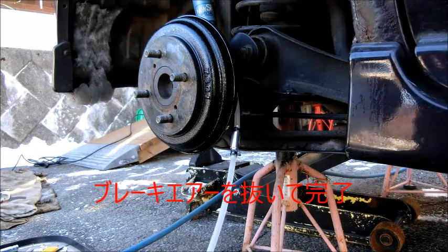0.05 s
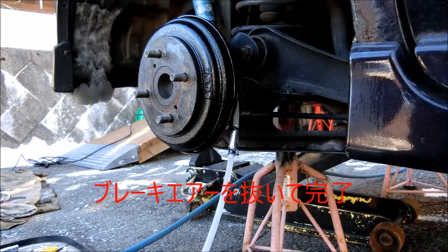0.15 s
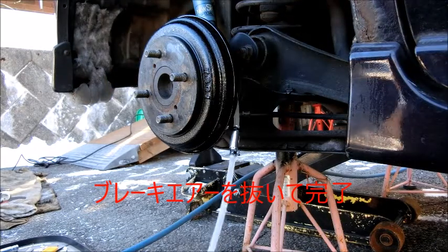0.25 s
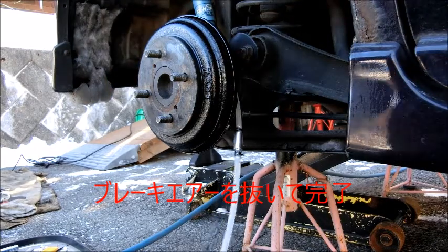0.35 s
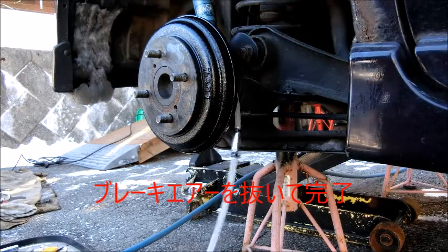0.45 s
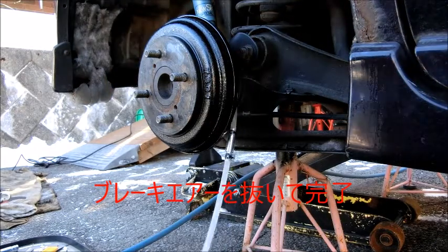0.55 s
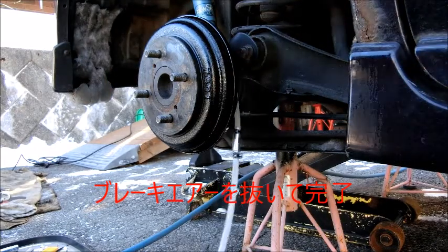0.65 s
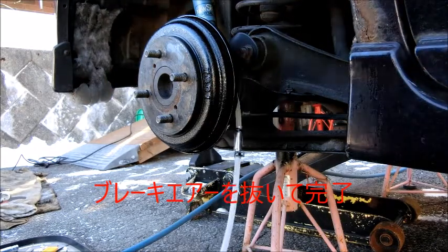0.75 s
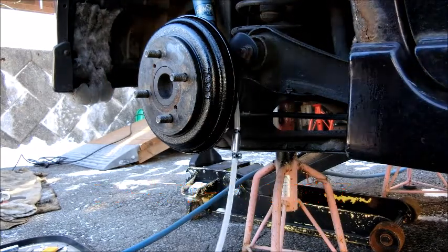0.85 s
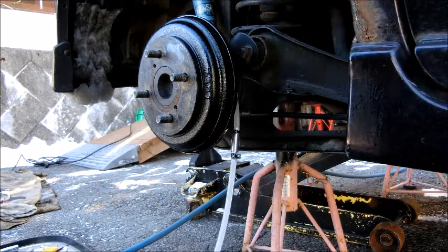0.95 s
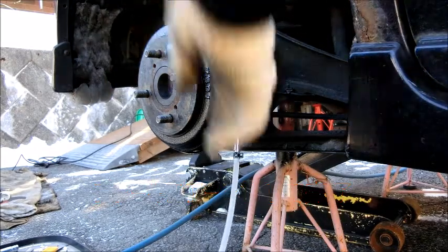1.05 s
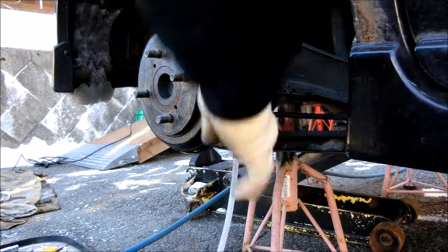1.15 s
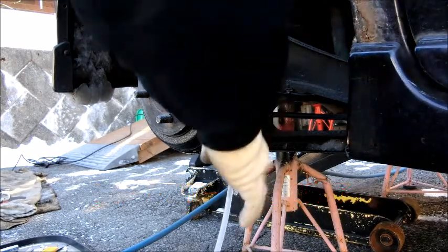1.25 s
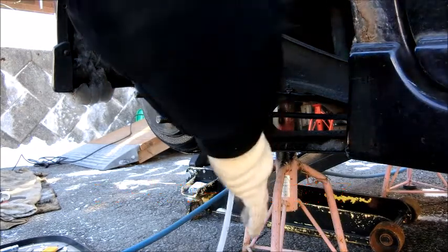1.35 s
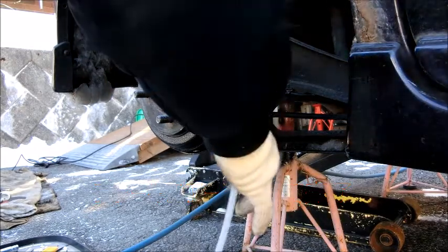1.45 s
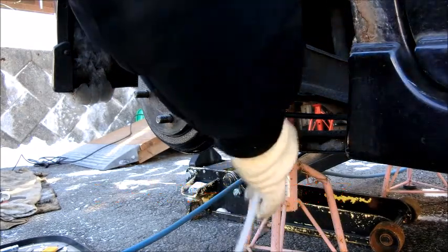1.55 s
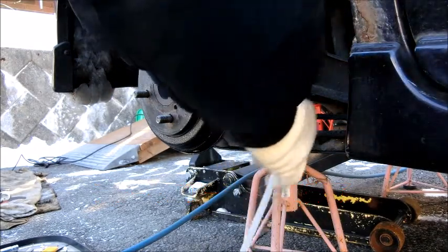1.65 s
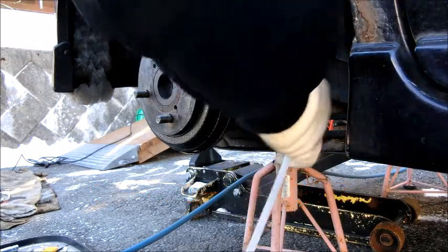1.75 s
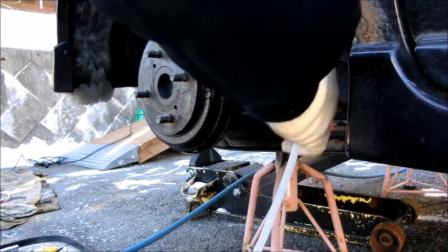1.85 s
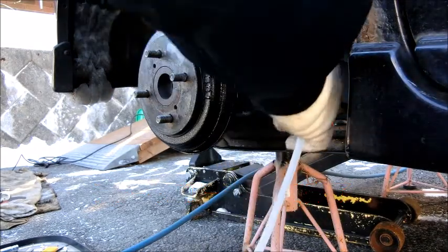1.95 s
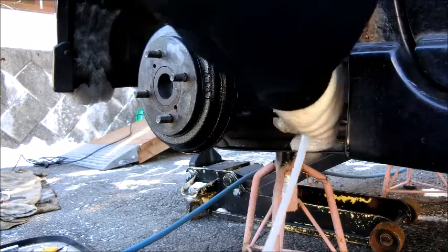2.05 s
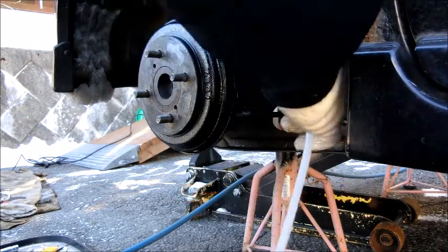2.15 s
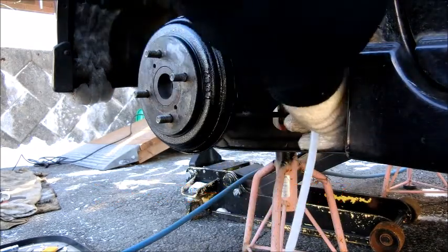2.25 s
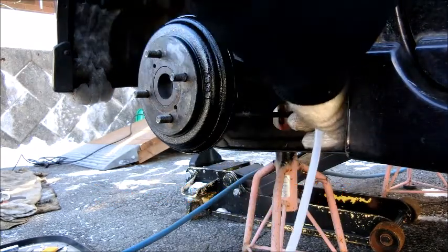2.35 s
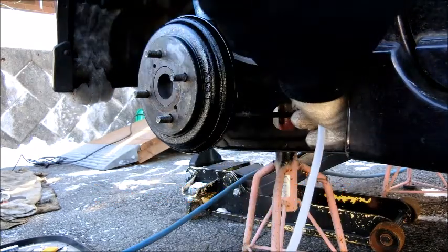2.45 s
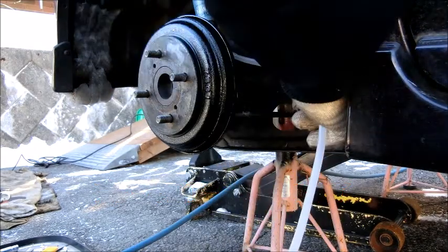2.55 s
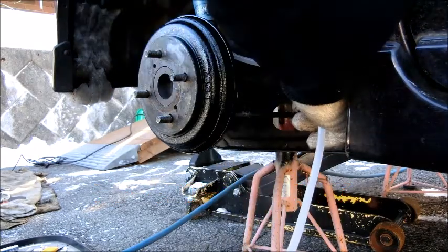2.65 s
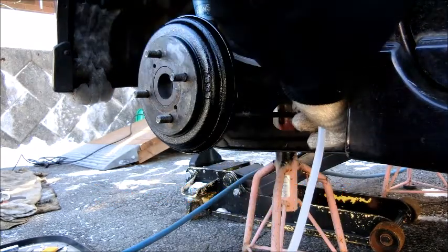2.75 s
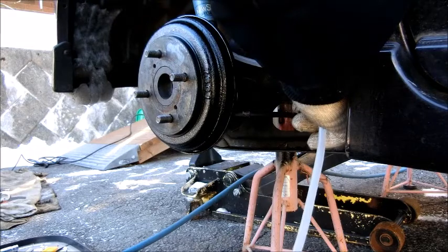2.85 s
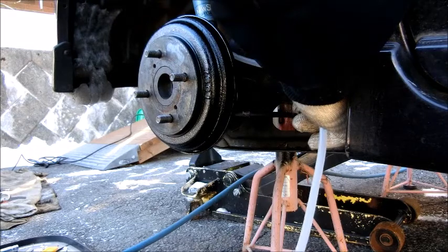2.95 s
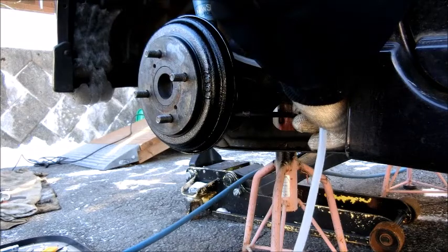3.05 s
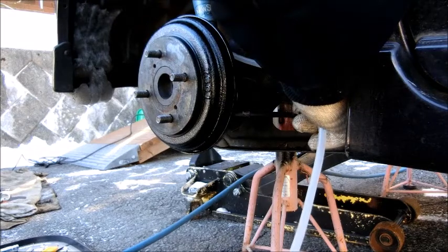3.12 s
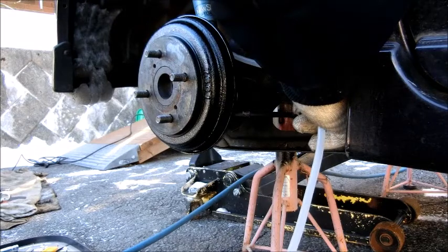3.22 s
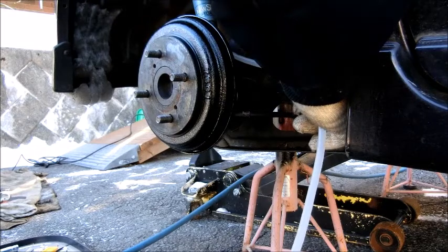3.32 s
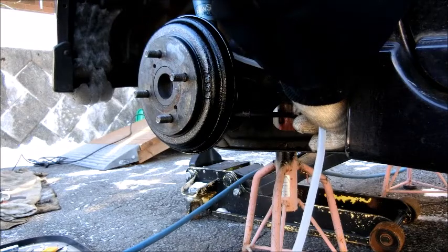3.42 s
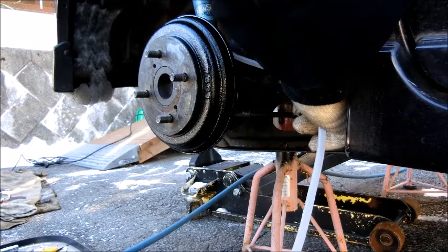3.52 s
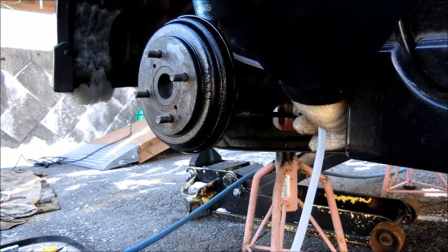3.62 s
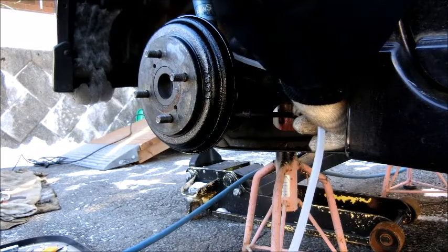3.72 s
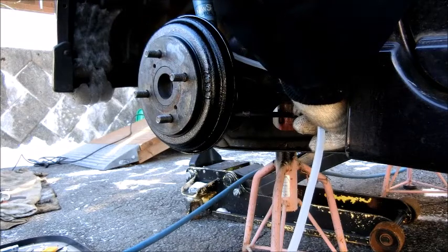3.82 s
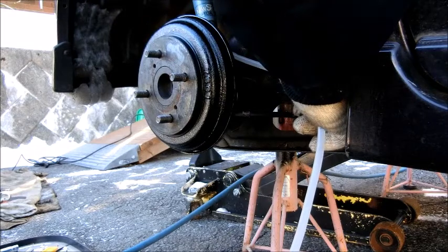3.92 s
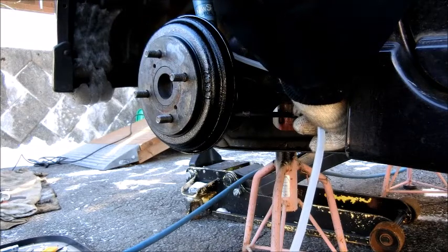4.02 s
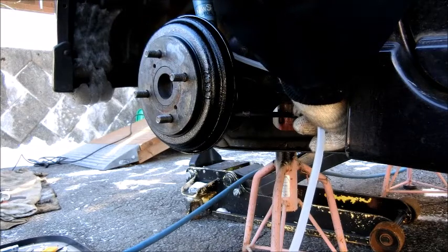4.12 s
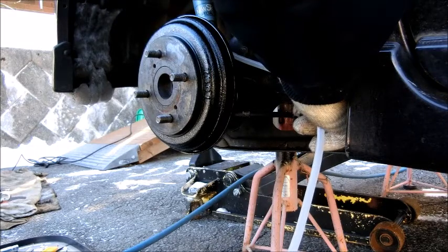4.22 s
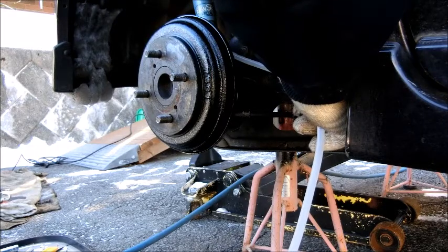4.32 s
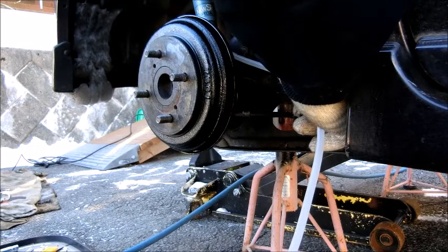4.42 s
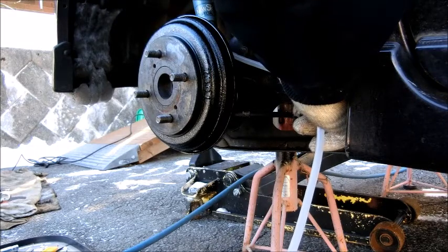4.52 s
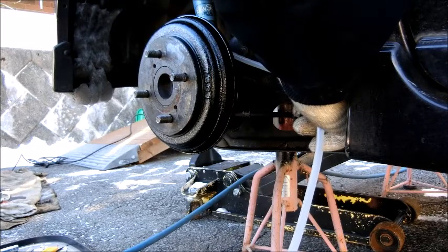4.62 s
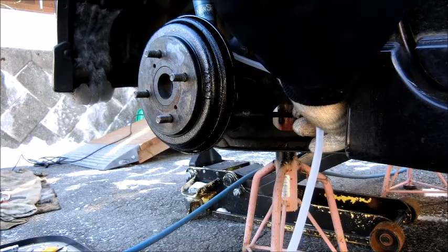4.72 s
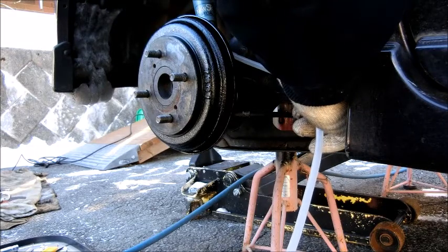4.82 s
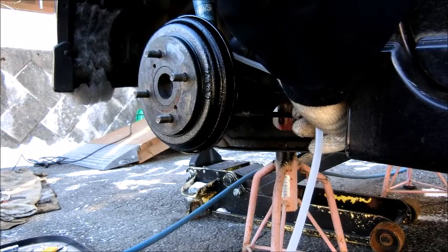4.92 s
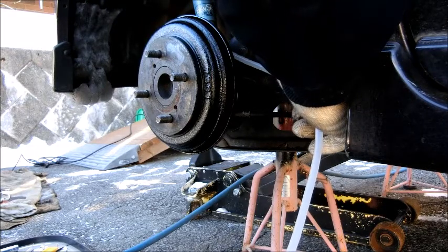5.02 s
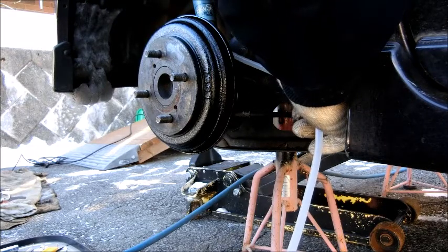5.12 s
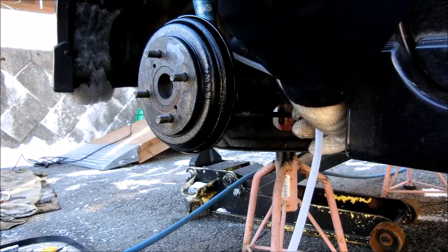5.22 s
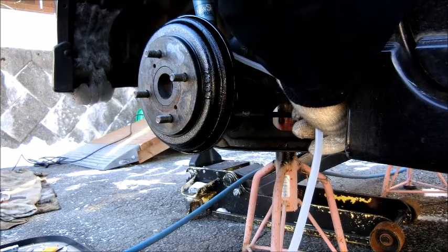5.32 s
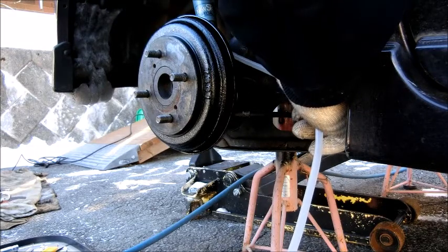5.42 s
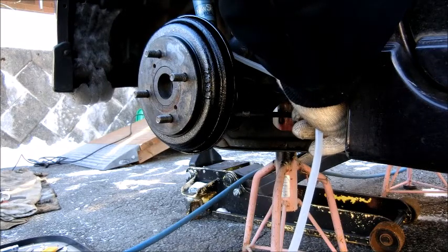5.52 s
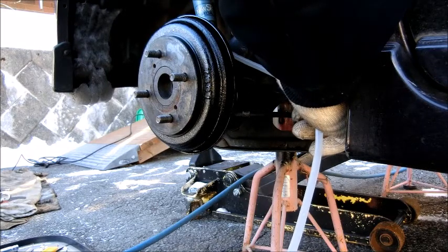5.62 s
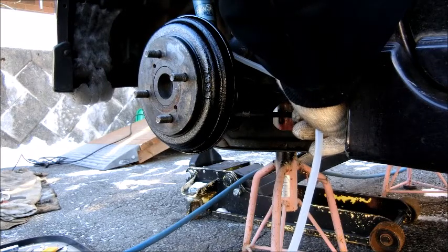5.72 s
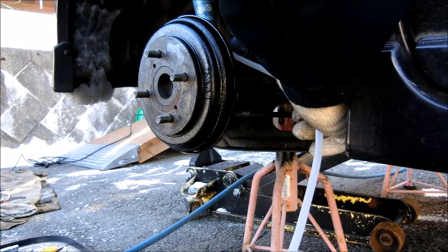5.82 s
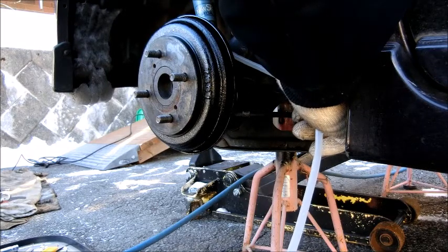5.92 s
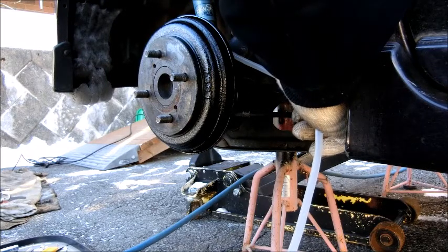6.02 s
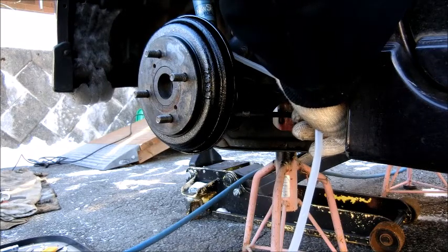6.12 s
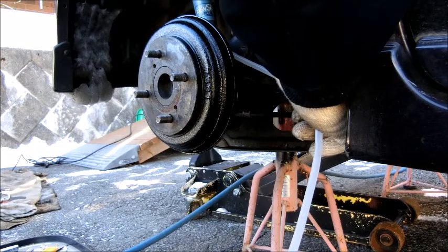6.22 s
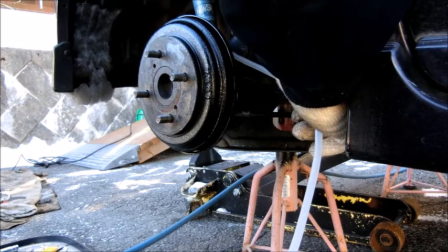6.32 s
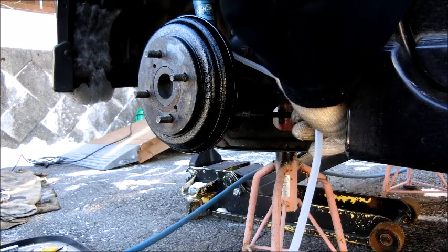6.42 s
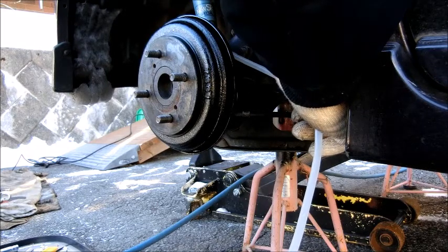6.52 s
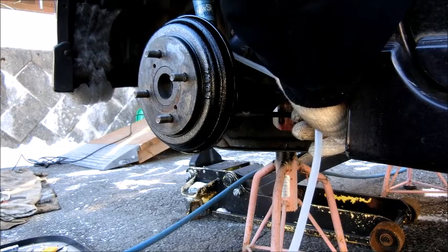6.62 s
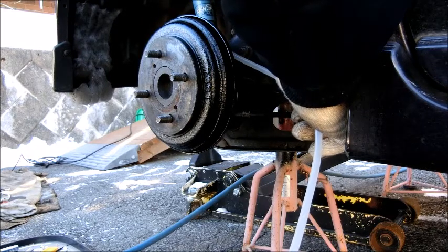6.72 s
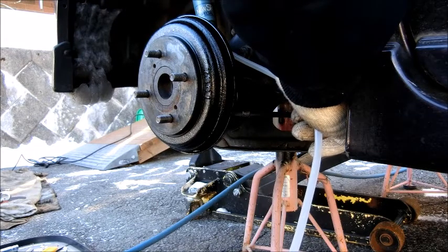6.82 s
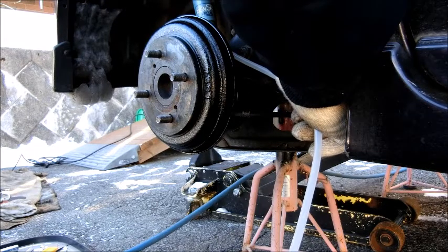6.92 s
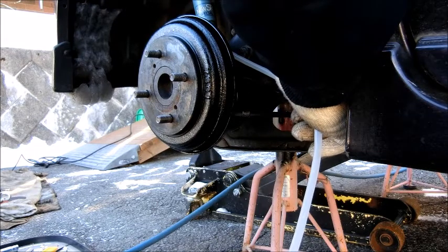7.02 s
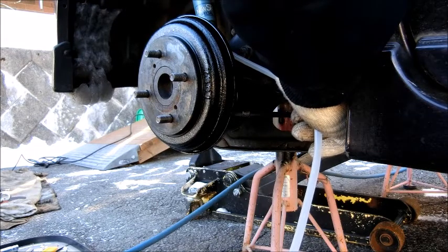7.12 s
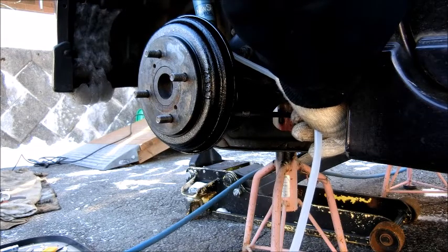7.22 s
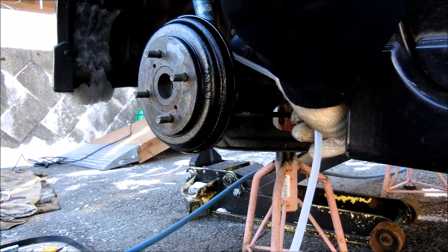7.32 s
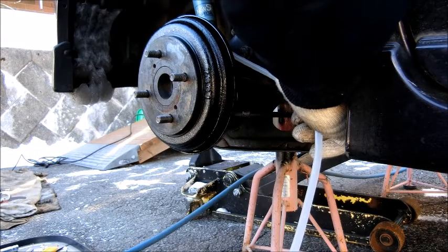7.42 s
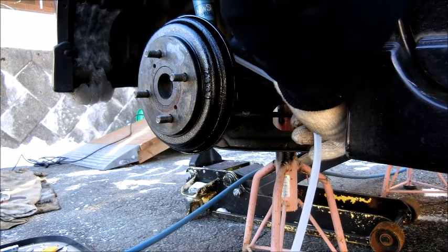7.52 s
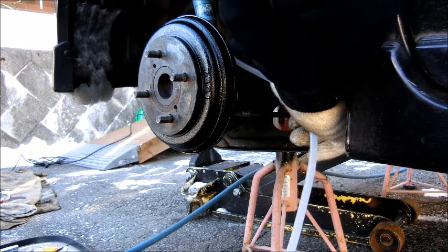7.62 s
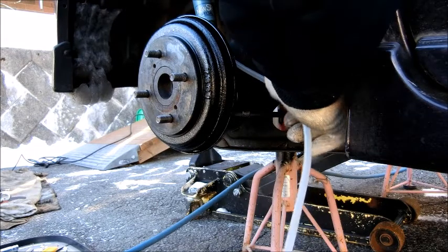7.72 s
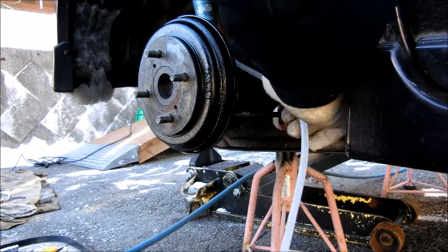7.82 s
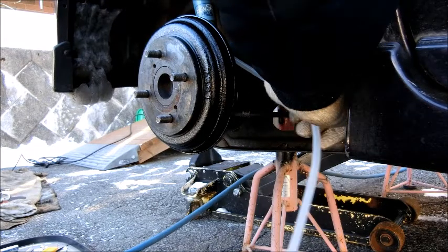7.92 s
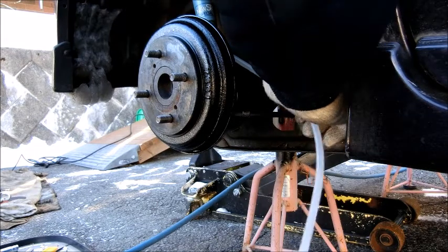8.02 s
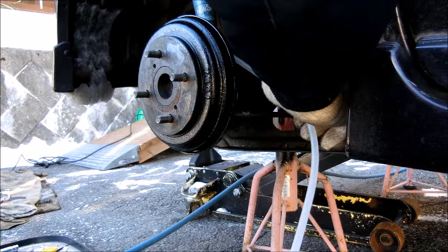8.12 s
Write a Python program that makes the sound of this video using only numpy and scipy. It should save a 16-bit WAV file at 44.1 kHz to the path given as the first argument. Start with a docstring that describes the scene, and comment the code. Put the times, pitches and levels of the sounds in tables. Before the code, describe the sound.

A loud, high hiss of compressed air from a brake bleeder dominates, starting abruptly after about two and a half seconds and running on with a slight flutter. Before it, the yard is quiet: a slight leak, a few light metal taps and ticks, a sleeve swishing near the microphone, brief wind puffs on the right and very faint distant tones.

```python
"""A loud, steady hiss of air starts after a few quiet taps and rustles. A hand opens an air-driven brake
bleeder beside a wheel hub: the hose coughs and the turbulent jet hisses on, its sound bouncing off hand,
drum and axle to each microphone port. Before that: a slight leak, a tool tapping steel, a sleeve rustling
past, wind puffs on the right port and faint far tones, over low yard noise."""
import sys
import numpy as np
from scipy import signal
from scipy.fft import rfft, irfft, next_fast_len
from scipy.io import wavfile
from scipy.ndimage import uniform_filter1d, map_coordinates

SR = 44100
rng = np.random.default_rng(int(sys.argv[2]) if len(sys.argv) > 2 else 0)


def wav_record(signal):
    """Record a signal, one row per channel, as 16-bit PCM in the file named by sys.argv[1]."""
    frames = np.transpose(np.atleast_2d(signal))
    bounded = np.clip(frames, -1, 1)
    # unit amplitude maps onto the largest positive 16-bit level
    quanta = np.round(bounded * 32767).astype(np.int16)
    wavfile.write(sys.argv[1], SR, quanta)


N = 359856


def jet():
    """Stored pressure surges, the jet hisses, the hose coughs; a recorder noise floor follows the hiss."""
    # open-jet level: t/s, level/dB
    flow = [(2.6, -16), (3.2, -16.5), (4.5, -17.5), (4.53, -18.5), (4.88, -17), (4.95, -18.5),
            (5.98, -16.5), (6.7, -17), (7.81, -16), (7.84, -18.5), (8.16, -17.5)]
    # flat recorder noise floor: f/Hz, density/dB
    floor_spectrum = [(20, -1), (80, -2), (400, -0.5), (2200, 1.5), (4000, 0.5), (7000, 4), (12000, -15)]
    # hollow hose spectrum: f/Hz, density/dB
    hose_spectrum = [(900, -40), (1700, -15), (2250, -5), (2800, -9), (4000, -11), (5500, -7), (7000, 2),
                     (8000, 3), (8700, 2), (9500, -40)]
    open_s, rise_db_per_s, floor_lead_s = 2.589, 748, 0.02
    surge_db, surge_s, floor_db = 2.5, 0.094, -14.5
    flow_db = curve(flow)
    since_s = np.arange(N) / SR - open_s
    held_s = np.maximum(since_s, 0)
    opening = amp(rise_db_per_s * np.minimum(since_s, 0))
    floor_gain = amp(flow_db + floor_db + rise_db_per_s * np.minimum(since_s + floor_lead_s, 0))
    surge = amp(surge_db * np.exp(-held_s / surge_s))
    hiss = amp(flow_db) * surge * nozzle_hiss()
    noise_floor = floor_gain * noise(floor_spectrum, [(500, 0), (2000, 0.17), (4000, 0.15)], 0.013)
    cough_gain = amp(-24.5) * decay(held_s, t60_s=0.3) + amp(-29) * decay(held_s, t60_s=2.6)
    cough = cough_gain * noise(hose_spectrum, [(2000, 0.6)], lag_ms=0.024)
    return opening * (hiss + cough) + noise_floor


def nozzle_hiss():
    """Turbulent hiss with slight flutter, reflected differently to each port."""
    # nozzle spectrum: f/Hz, density/dB
    spectrum = [(1500, -29.5), (3000, -27.5), (4500, -12), (6500, -11), (9000, 0.5), (12000, 1),
                (14000, -1), (15250, -3), (15500, -12), (15800, -15.5)]
    # near reflections per port: delay/ms, gain in first grip, gain in second grip
    echoes_left = [(0.309, -0.24, -0.05), (0.383, -0.03, 0.1), (0.488, -0.03, -0.1), (0.676, -0.18, -0.14),
                   (0.82, 0.12, 0.17), (0.953, -0.1, -0.04), (1.024, -0.08, -0.01), (1.78, -0.08, -0.05),
                   (1.928, 0.07, 0.05)]
    echoes_right = [(0.177, 0.19, 0.04), (0.282, 0.06, -0.14), (0.461, 0.1, -0.06), (0.599, -0.08, 0.05),
                    (0.694, -0.13, -0.08), (0.781, -0.01, 0.08), (0.834, 0.08, 0.07), (1.045, -0.04, -0.07),
                    (1.76, -0.04, -0.02)]
    source = noise(spectrum, [(4000, 0.6), (8000, 0.68), (15000, 0.66)], lag_ms=0.061)
    left, right = eddies(source, depth_db=1.23)
    ports = np.array([amp(1.25) * reflections(left, echoes_left), reflections(right, echoes_right)])
    flutter = amp(0.1 * wobble(9.1) + 0.3 * wobble(70) + 0.23 * wobble(400))
    return flutter * unit_rms(ports)


def reflections(x, echoes):
    """Direct sound plus near echoes, whose gains blend as the hand shifts."""
    # hand on the bleeder: t/s, blend (0 first grip, 1 second)
    grip = [(4.2, 0.02), (4.6, .6), (5.6, 1), (7.4, .98), (7.6, 0.86)]
    blend = np.clip(curve(grip), 0, 1)
    delay_ms, *gains = np.transpose(echoes)
    comb = lambda hz: 1 + np.array(gains) @ np.exp(-2j * np.pi * hz * delay_ms[:, None] / 1000)
    first, second = filtered(x, comb)
    return (1 - blend) * first + blend * second


def eddies(x, depth_db):
    """Random gain patches in time and frequency as eddies come and go."""
    bins = signal.stft(x, nperseg=256)[2]
    field = uniform_filter1d(rng.standard_normal(bins.shape[1:]), size=3, axis=0)
    field = uniform_filter1d(field, size=12, axis=1)
    return signal.istft(bins * amp(depth_db * unit_rms(field)), nperseg=256)[1][:, :N]


def tool_taps():
    """A tool chatters on steel and rings it; loose contact blurs the higher modes. Mono."""
    # blows: t/s, level/dB, brightness/(dB/octave)
    taps = [(0.3154, -33, -3), (0.377, -37, 0.5), (0.4167, -47, 5), (0.4222, -45, -0.5)]
    # steel modes: f/Hz, level/dB, t60/s
    modes = [(620, -14, 0.1), (1127, -6, 0.16), (1350, -9, .05), (1990, -4.5, 0.072), (2203, -2.5, 0.13),
             (2620, 1.5, 0.04), (2600, -6, 0.04), (3480, -3, 0.064), (3960, -3, 0.063), (4270, -8, .04),
             (5300, -1, 0.047), (6400, -12, 0.058), (7000, 0, 0.048), (8000, -8, .04)]
    out, t = np.zeros(N), np.arange(SR // 4) / SR
    bounce = round(0.0071 * SR)  # the tool lands twice
    for start_s, db, bright_db in taps:
        phase_walks = 0.11 * np.cumsum(rng.standard_normal((len(modes), len(t))), axis=1)
        ring = np.zeros(len(t))
        for (hz, mode_db, t60_s), walk in zip(modes, phase_walks):
            gain = amp(mode_db + bright_db * np.log2(hz / 2500) + rng.normal(0, 2.0))
            phase = 2 * np.pi * (hz * t + rng.random()) + walk * hz / 4000
            ring += gain * decay(t, t60_s) * np.sin(phase)
        rattle = (1.16 * decay(t, 0.17) + 1.2 * decay(t, 0.0091)) * rng.standard_normal(len(t))
        blow = (ring + amp(bright_db) * rattle) * (1 - np.exp(-t / 0.00034))
        blow[bounce:] += 0.28 * blow[:-bounce]
        out[round(start_s * SR):][:len(t)] += amp(db) * blow
    return out


def ticks():
    """Dry knocks on the same steel part: three tones and a dull crack. Mono."""
    # knocks: t/s, level/dB, f/Hz, t60/s
    knocks = [(0.72, -39, 1500, .012), (.753, -36, 659, .012), (0.78, -35, 3150, 0.013),
              (0.783, -36, 1500, .012), (0.7923, -30.5, 1180, 0.011), (0.846, -28, 1260, .016),
              (.86, -38, 700, .012), (.947, -38, 1680, 0.054), (.959, -39, 1700, .04),
              (1.1247, -27, 1070, .008), (2.099, -44, 790, .014)]
    out, t = np.zeros(N), np.arange(SR // 4) / SR
    for start_s, db, hz, t60_s in knocks:
        phase = 2 * np.pi * hz * t
        ring = np.sin(phase) + 0.28 * np.sin(0.4 * phase) + 0.5 * np.sin(1.7 * phase)
        crack = 0.78 * decay(t, 0.0055) * uniform_filter1d(rng.standard_normal(len(t)), size=6)
        out[round(start_s * SR):][:len(t)] += amp(db) * (decay(t, t60_s) * ring + crack)
    return out


def sleeve():
    """Cloth rubs in clumps of fibres; a bright and a dull band swell with each swish."""
    # swishes: centre/s, length/s, bright level/dB, dull level/dB
    swishes = [(.03, 0.36, -47, -53.5), (0.598, 0.29, -45.5, -48), (.83, 0.33, -42.5, -48.5),
               (0.969, 0.27, -37, -45.5), (1.14, 0.44, -39.5, -45), (1.66, 0.42, -49, -56)]
    # bright rub and dull fold spectra: f/Hz, density/dB
    cloth = [(1500, -28), (2500, -14), (3400, -13), (3700, -5), (6000, -4.5), (9000, -2.5), (13000, -3),
             (15300, -7), (15800, -14)]
    folds = [(120, -47), (200, -19), (382, -10), (436, -13.5), (1010, -9), (3500, -13.5), (4550, -34),
             (7700, -120)]
    sharpness = 1.4
    centre_s, length_s, *levels_db = np.transpose(swishes)
    position = (np.arange(N) / SR - centre_s[:, None]) / length_s[:, None]
    swell = np.cos(np.pi * np.clip(position, -0.5, 0.5)) ** (2 * sharpness)
    bright_gain, dull_gain = np.sqrt(amp(levels_db) ** 2 @ swell)
    clumps = amp(0.98 * wobble(59.4) + 0.54 * wobble(300))
    bright = bright_gain * noise(cloth, [(3000, 0.38), (15000, 0.23)], lag_ms=0.057)
    dull = dull_gain * noise(folds, [(300, 0.83), (3000, 0.71)], lag_ms=0.03)
    return unit_rms(clumps) * (bright + dull)


def wind_puffs():
    """Each eddy pushes the right port for a cycle or two, with a quicker flap on top."""
    # puffs: t/s, level/dB, f/Hz
    puffs = [(1.202, -37.5, 53.7), (1.219, -32, 93), (1.36, -39, 81), (1.47, -37, 112), (1.595, -31.5, 100),
             (1.609, -29, 130), (1.616, -35, 230), (1.694, -23.5, 158), (1.71, -30, 231), (1.749, -33, 120),
             (1.7751, -23, 178), (1.797, -36.5, 120), (1.829, -42, 120)]
    out, t = np.zeros(N), np.arange(SR // 8) / SR
    for start_s, db, hz in puffs:
        age = t * hz / 0.65  # envelope peaks at 0.65 cycle
        phase = 2 * np.pi * hz * t
        push = age * np.exp(1 - age) * (np.sin(phase) + 0.22 * np.sin(2.27 * phase))
        out[round(start_s * SR):][:len(t)] += amp(db) * push
    return np.array([amp(-23) * out, out])  # left port sheltered


def leak():
    """Faint, patchy hiss of escaping air."""
    # leak spectrum: f/Hz, density/dB
    spectrum = [(2500, -31), (3100, -20), (3500, -1.5), (3700, -7), (4600, -4.5), (5300, -11.5),
                (7000, -8.5), (8500, -7.5), (9800, -1.5), (10600, 0.5), (11300, -7.5), (11800, -14),
                (14500, -12), (15700, -22)]
    return amp(-47.5) * eddies(noise(spectrum, [(4000, 0.31), (15000, 0.32)], lag_ms=0.062), depth_db=2)


def wind_rumble():
    """Low breeze noise, gusting separately on each port."""
    # breeze: t/s, level/dB
    breeze = [(0.0, -55), (0.57, -60), (0.9, -58), (1.24, -49), (1.5, -54.5), (1.69, -49), (1.95, -56),
              (2.6, -59)]
    gusts = amp(3 * np.array([wobble(25), wobble(25)]))
    rumble = noise([(20, -2.5), (60, -3.5), (150, 1), (350, -19), (800, -80)], [(100, 0.14)], lag_ms=0)
    return amp(curve(breeze)) * unit_rms(gusts * rumble)


def far_tones():
    """Faint tones come and go, wavering in level and phase. Mono."""
    # tones: t/s, hold/s, f/Hz, level/dB
    tones = [(0, 0.19, 799, -54), (.24, .17, 799, -48), (.5, .9, 799, -63), (0.07, 0.11, 2130, -50.5),
             (.62, .1, 2130, -56.5), (.85, 0.11, 2130, -55), (1.45, 0.28, 2130, -58), (.58, .66, 1100, -59),
             (1.92, 0.26, 987, -62.5), (1.553, 0.076, 765, -53)]
    rise_s, fall_s = 0.03, 0.12
    out, t = np.zeros(N), np.arange(N) / SR
    waver_db, drift_rad = 3 * wobble(16.14), 0.59 * wobble(14)
    for start_s, hold_s, hz, db in tones:
        ramp = 1 + np.minimum((t - start_s) / rise_s, (start_s + hold_s - t) / fall_s)
        out += amp(db + waver_db) * np.clip(ramp, 0, 1) ** 2 * np.sin(2 * np.pi * hz * t + drift_rad)
    return out


def yard():
    """Steady, low outdoor noise."""
    # yard spectrum: f/Hz, density/dB
    spectrum = [(18, -36), (30, -6), (113, -4.5), (140, -7.5), (864, -12), (972, -11.5), (1090, -14),
                (3200, -16), (4160, -58), (7040, -120)]
    # left-right likeness: f/Hz, shared power fraction
    likeness = [(60, 0.61), (300, 0.97), (1400, 0.64), (3000, 0.45)]
    return amp(-55) * noise(spectrum, likeness, lag_ms=0.01)


def amp(db):
    return 10 ** (np.asarray(db) / 20)


def unit_rms(x):
    return x / np.sqrt(np.mean(x ** 2) + 1e-20)


def decay(t, t60_s):
    return amp(-60 * t / t60_s)


def curve(points):
    """(t/s, value) points interpolated per sample."""
    return np.interp(np.arange(N) / SR, *np.transpose(points))


def log_curve(points, hz):
    """(f/Hz, value) points interpolated on a log axis."""
    knots_hz, values = np.transpose(points)
    return np.interp(np.log(hz + 1), np.log(knots_hz + 1), values)


def wobble(rate_hz):
    """Smooth random curve, rate_hz knots a second."""
    knots = rng.standard_normal(int(N * rate_hz / SR) + 4)
    return map_coordinates(knots, [np.arange(N) * rate_hz / SR])


def filtered(x, response):
    """Apply a complex frequency response."""
    size = next_fast_len(N + 8192)
    return irfft(rfft(x, size) * response(np.fft.rfftfreq(size, 1 / SR)), size)[..., :N]


def noise(spectrum, likeness, lag_ms):
    """Stereo noise, rms 1. Likeness: f/Hz, shared power fraction; the shared part lags on the right."""
    size = next_fast_len(N)
    hz = np.fft.rfftfreq(size, 1 / SR)
    real, imag = rng.standard_normal((2, 3, len(hz)))
    common, *own = real + 1j * imag
    shared = np.clip(log_curve(likeness, hz), 0, 1)
    delay = np.exp(1j * np.pi * hz * lag_ms / 1000 * np.array([[1], [-1]]))
    ports = delay * np.sqrt(shared) * common + np.sqrt(1 - shared) * np.array(own)
    return unit_rms(irfft(amp(log_curve(spectrum, hz)) * ports, size)[:, :N])


def scene():
    """Stereo mix; taps and ticks are louder and one sample later on the right."""
    mix = jet() + leak() + wind_rumble() + far_tones() + yard() + sleeve() + wind_puffs()
    contacts = tool_taps() + ticks()
    return mix + np.array([amp(-0.7) * contacts, amp(2.2) * np.roll(contacts, 1)])


def record(dry):
    """Soft peak limit, then a hard band limit."""
    ceiling, top_hz = 0.95, 15780
    rounded = dry / (1 + abs(dry / ceiling) ** 4) ** (1 / 4)
    return filtered(rounded, lambda hz: hz < top_hz)


dry = scene()
out = record(dry)
wav_record(out)
```